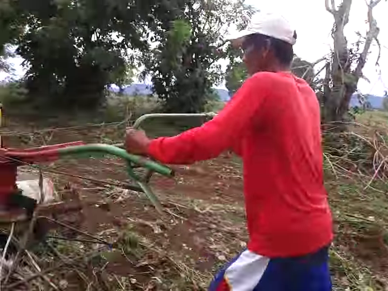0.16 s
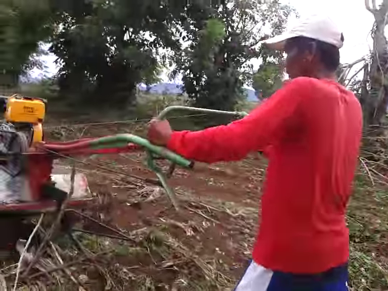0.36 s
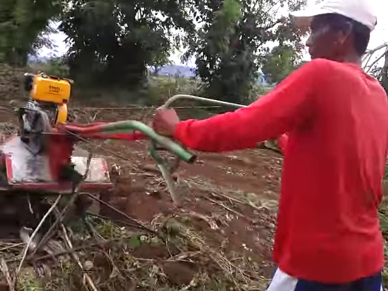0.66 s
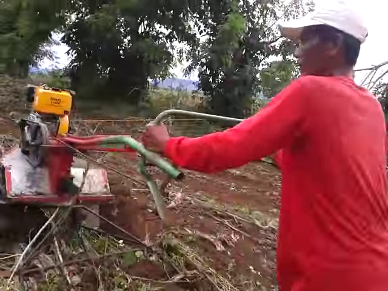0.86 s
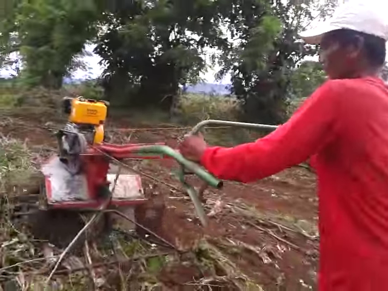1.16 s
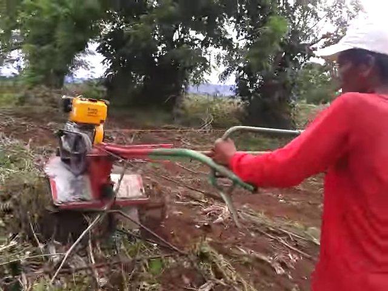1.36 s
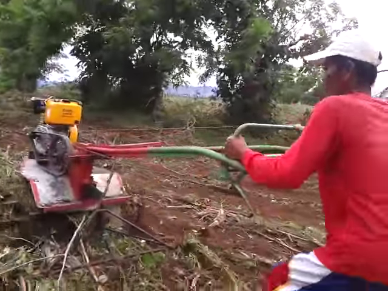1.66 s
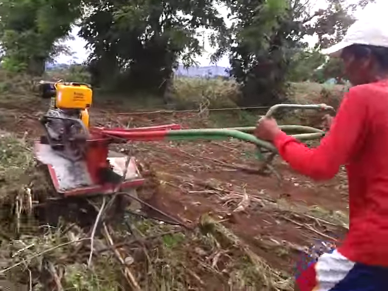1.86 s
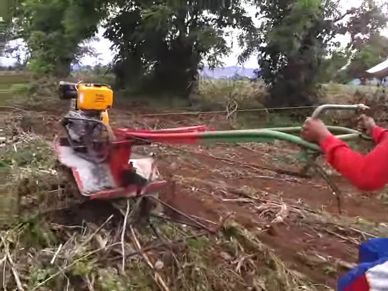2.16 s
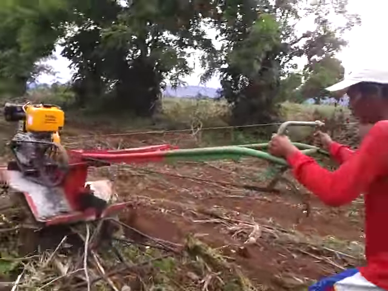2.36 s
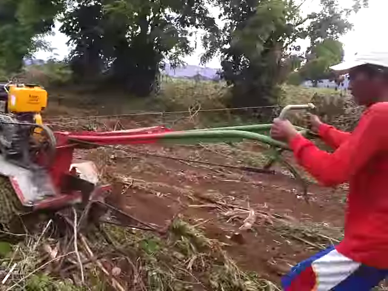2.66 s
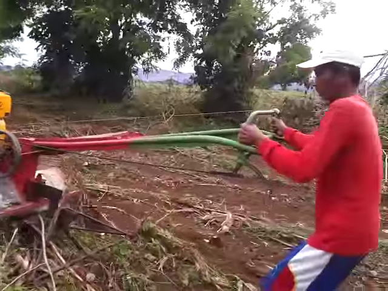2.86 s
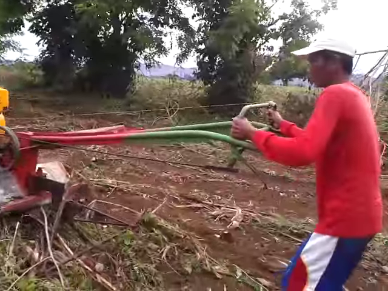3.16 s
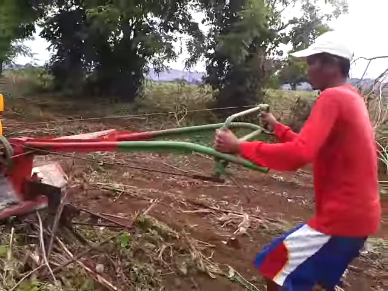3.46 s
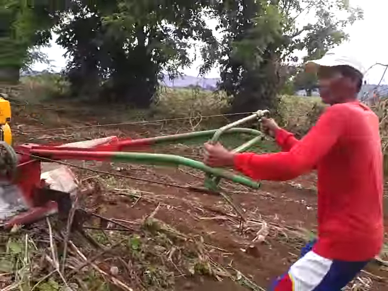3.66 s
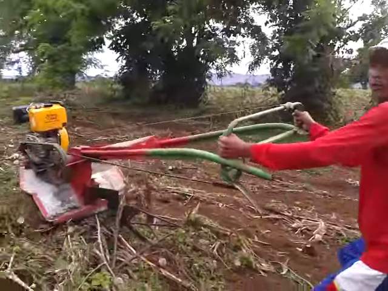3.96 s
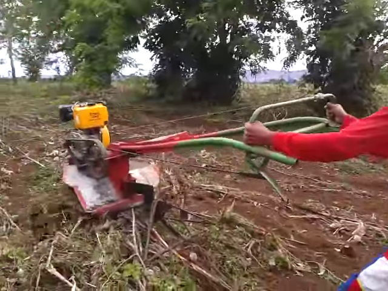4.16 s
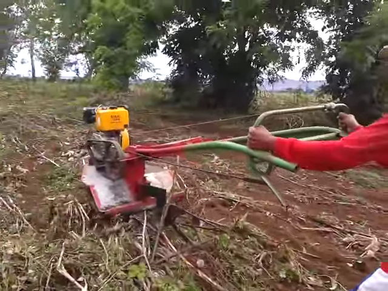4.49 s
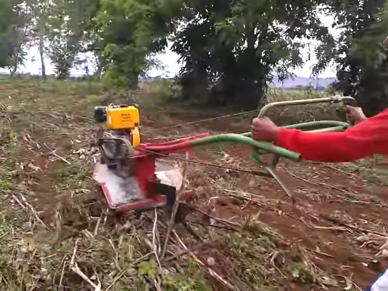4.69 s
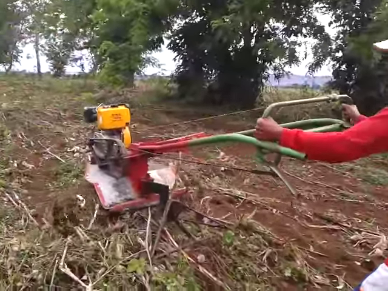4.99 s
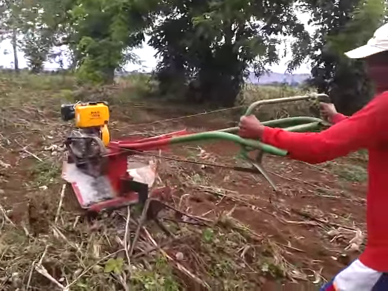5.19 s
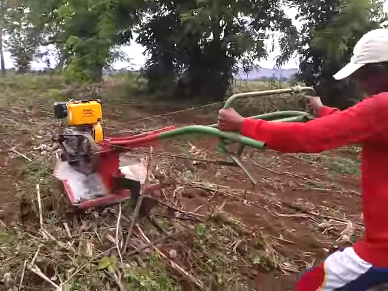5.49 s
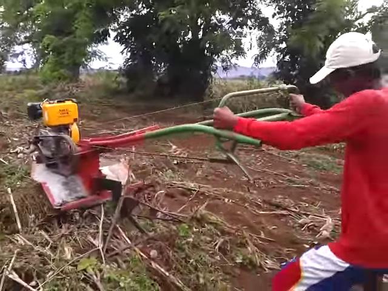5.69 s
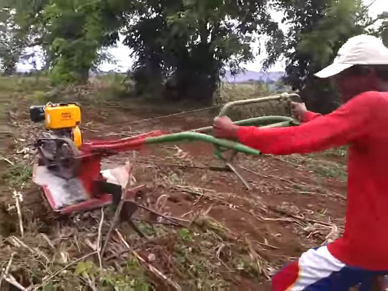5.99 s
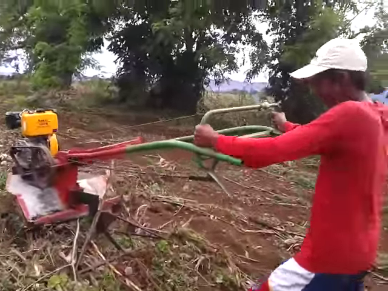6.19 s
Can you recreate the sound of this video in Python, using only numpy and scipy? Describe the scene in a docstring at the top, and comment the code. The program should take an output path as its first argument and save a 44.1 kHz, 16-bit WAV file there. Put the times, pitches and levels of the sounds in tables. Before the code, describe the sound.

Close, rattly putter of a walk-behind tiller, about seventeen or eighteen pops a second, with airy soil rush, buzzing tinwork and sharp metallic clinks.

```python
"""In an open field, a single-cylinder four-stroke tiller works through weedy soil a few metres from the listener.
Each firing is a quick high-then-low muffler pop of two falling notes; a repeating comb of engine orders clatters in step.
Shaped noise makes cooling air, churned soil and a singing cowl; dense taps make the guards jingle, slap and knock.
Loose steel tinkles and clinks as decaying sines. A small microphone with a limiter holds down the loudest peaks."""
import sys
import numpy as np
from scipy import signal
from scipy.fft import rfft, irfft
from scipy.io import wavfile
from scipy.ndimage import uniform_filter1d, minimum_filter1d, map_coordinates

SR = 44100
rng = np.random.default_rng(int(sys.argv[2]) if len(sys.argv) > 2 else 0)


def put_to_file(sound):
    """Save the sound as 16-bit audio at rate SR, in the file named by the first command-line argument."""
    columns = np.atleast_2d(sound).T  # one column per channel
    safe = np.clip(columns, -1, 1)
    whole_steps = np.round(safe * 32767)
    wavfile.write(sys.argv[1], SR, whole_steps.astype(np.int16))


N = 279594
TIME = np.arange(N) / SR

# engine speed, sagging as the tines bite: time_s, firings_per_s
ENGINE_SPEED = [(0.0, 17.469), (0.3, 17.735), (1.04, 17.776), (1.33, 17.621), (1.75, 17.849),
                (3.26, 17.692), (3.69, 17.48), (4.38, 17.703), (4.53, 17.56), (5.47, 17.553),
                (5.68, 17.692), (6.34, 17.262)]
# how near the operator's body stands: time_s, nearness_0_to_1
OPERATOR_NEARNESS = [(0, 0.56), (.22, 0.49), (.4, 0.01), (3, 0.06), (5.5, 0), (5.8, 0.43), (6.34, 0.61)]
# level of the muffler's low note, ahead of the exhaust gain: time_s, level_db
LOW_NOTE_LEVEL = [(0, -15.5), (1.5, -14), (2, -18), (2.45, -13), (3.1, -14), (3.9, -12.5), (5.2, -15.5),
                  (6.34, -15.5)]
# resonances of the muffler shell: pitch_hz, width_hz, level_db
MUFFLER_SHELL = [(651.3, 12, 3), (741.5, 34, -5), (1251, 30, -0.5), (1359, 15.4, 3.5), (1628, 23, 2.5)]
# tone of the engine block: frequency_hz, relative_level_db
BLOCK_TONE = [(60, -48), (88, -32), (105, -9.5), (185, -10.5), (212, 3.5), (285, 1), (370, 3.5), (440, -6),
              (540, 6), (660, 9.5), (780, 4), (900, 0), (1250, 8), (1700, -12)]
# tone of the cooling air and soil: frequency_hz, relative_level_db
AIR_TONE = [(25, -21), (70, -23), (150, -20.5), (260, -4.5), (450, -2), (680, 8), (900, -0.5), (1300, 1),
            (2200, 3.5), (2550, 6.5), (3100, 2.5), (4500, -2.5), (9000, -35), (17000, -20)]
# tone of the thin steel guards: frequency_hz, relative_level_db
GUARD_TONE = [(150, -40), (2800, -24), (3700, -14), (4500, -9), (5300, -4), (5700, 0.5), (6050, 0.5),
              (6500, -6.5), (7100, -10.5), (8200, -18), (12000, -26.5), (17000, -30)]
# the hardest knocks of the guards: start_s, level_db
GUARD_KNOCKS = [(1.264, -7), (1.324, -12), (3.273, -8), (3.561, -7), (4.028, -11), (5.792, -4),
                (5.848, -11), (6.096, -3), (6.189, -4)]
# how hard the loose steel rings: time_s, level_db
STEEL_LEVEL = [(0, -39), (.55, -22), (1, -12), (1.5, -26), (2.7, -21), (4.7, -24), (5.6, -24),
               (6.34, -15.5)]
# ringing modes of the loose steel: pitch_hz, relative_level_db, t60_s
STEEL_MODES = [(4610, 5.5, 0.14), (5178, 13.5, 0.098), (5560, -24, .05), (5620, 6, 0.12), (6010, 4, 0.16),
               (6630, 5, 0.27), (7100, -21, 0.034), (7700, -2, 0.3), (8800, -7.5, 0.054),
               (10200, -11, 0.14), (14100, -24, 0.11)]
# the hardest blows of steel on steel: start_s, level_db
STEEL_CLINKS = [(0.47, -12), (.5122, 7), (0.909, -4.5), (1.285, -3), (1.4172, 2.5), (1.6112, -2.5),
                (1.66, -5), (1.7654, -4), (1.81, -2), (4.147, -1.5), (4.89, -5.5), (5.892, 1.5), (6.001, 7),
                (6.2781, 2.5)]
# colour the operator's body gives rush and rattle when close: frequency_hz, gain_db
BODY_TONE = [(800, 0), (1150, 9.5), (1800, 10), (2300, 6.5), (2600, 1), (3050, -16), (3600, -0.5),
             (5000, -9), (6300, -4.5), (7500, -24.5), (11000, -4.5), (15500, -5)]

FIRST_FIRING_S = .0203  # before jitter
# the muffler's nominal notes: pitch_hz at the peak, glide_hz_per_s, peak_s, spread_s
HIGH_NOTE = (1320, -70000, .0027, .0017)
LOW_NOTE = (690, -22000, .0066, .0026)
# the high note's usual level ahead of the exhaust gain, and its lift when the outlet
# faces the listener or the operator's body reflects it
HIGH_DB, FACING_DB, REFLECTED_DB = -13, 2, 8.5
# the machine swings round once: when the outlet faces the listener, and for how long
FACING_S, FACING_SPREAD_S = 3.11, 0.86
# the guards' usual jingle, and its lift when the operator's body reflects it
JINGLE_DB, JINGLE_NEAR_DB = -13.5, 9
CLINK_HZ = 5207  # hard blows mainly wake the steel mode nearest this pitch
TOP_HZ = 17100  # upper limit of the microphone


def undb(db):
    """Decibels to gain."""
    return 10 ** (np.asarray(db) / 20)


def unit(x):
    """Scale to rms 1."""
    return x / np.sqrt(np.mean(x ** 2))


def curve(table):
    """A two-column table as a curve over time."""
    s, value = np.transpose(table)
    return np.interp(TIME, s, value)


def ring(x, response):
    """Pass a sound through an impulse response."""
    return signal.oaconvolve(x.astype(np.float32), response.astype(np.float32))[:N]


def colour(x, points, size=4096):
    """Minimum-phase filter with the given outline of frequency_hz, level_db."""
    hz, db = np.transpose(points)
    f = np.maximum(np.fft.rfftfreq(size, 1 / SR), 1)
    outline_db = np.interp(np.log(f), np.log(hz), db)
    # folding the cepstrum forward keeps the response from sounding early
    cepstrum = irfft(np.log(undb(outline_db)))
    cepstrum[1:size // 2] *= 2
    cepstrum[size // 2 + 1:] = 0
    return ring(x, irfft(np.exp(rfft(cepstrum))))


def resonate(x, hz, width_hz):
    """One band-pass resonance."""
    return signal.lfilter(*signal.iirpeak(hz, hz / width_hz, fs=SR), x)


def high_pass(x, order, hz):
    """Butterworth bass cut."""
    return signal.sosfilt(signal.butter(order, hz, "high", fs=SR, output="sos"), x)


def strikes(times, sizes):
    """One impulse at each time."""
    return np.bincount(np.clip(np.asarray(times) * SR, 0, N - 1).astype(int), sizes, N)


def walk(rate):
    """Random wander in straight lines between normal draws, `rate` draws per second."""
    steps = rng.standard_normal(N // 16)
    return np.interp(TIME * rate, np.arange(len(steps)), steps)


def drift(sounds):
    """Fade slowly through several sounds, one after another, at even power."""
    place = TIME / TIME[-1] * (len(sounds) - 1)
    return sum(x * np.sqrt(np.maximum(1 - np.abs(place - k), 0)) for k, x in enumerate(sounds))


def nearness():
    """How near the operator's body stands, 0-1."""
    return curve(OPERATOR_NEARNESS)


def crank(jitter_s=0.00015):
    """Firing times, engine cycles turned, the number of the running cycle and the time since its firing."""
    turns = np.cumsum(curve(ENGINE_SPEED)) / SR
    turns -= np.interp(FIRST_FIRING_S, TIME, turns)
    steady = np.interp(np.arange(int(turns[-1]) + 1), turns, TIME)
    # one firing ahead of the start gives the opening its dying pop
    firings = np.r_[FIRST_FIRING_S - 1 / ENGINE_SPEED[0][1], steady]
    firings = firings + jitter_s * rng.standard_normal(len(firings))
    cycle = np.maximum(np.searchsorted(firings, TIME) - 1, 0)
    age = np.maximum(TIME - firings[cycle], 0)
    return firings, turns, cycle, age


def note(age, hz, glide, peak_s, spread_s, stretch):
    """A few cycles that swell, sink in pitch and die; a stretched note sinks more slowly."""
    t = age - peak_s
    swell = np.exp(-(t / (spread_s * stretch)) ** 2 / 2)
    swell = swell * np.minimum(age * 2000, 1)  # half a millisecond of fade-in
    cycles = hz * t + glide / stretch ** 4 * t ** 2 / 2
    return unit(swell * np.sin(2 * np.pi * cycles))


def exhaust(firings, cycle, age, gain_db=-10.0, scatter_db=.5, gas=0.24, crack_db=-29, crack_s=0.0097,
            tail_db=-14, tail_s=0.0076, tail_rise_s=0.0017):
    """Blow-down sounds the muffler's high note, then its low one as pressure drops; frame and ground scatter both."""
    high_chance, low_chance, warm_chance, length_chance = rng.standard_normal((len(firings), 4))[cycle].T
    facing = np.exp(-((TIME - FACING_S) / FACING_SPREAD_S) ** 2)
    high_db = HIGH_DB + FACING_DB * facing + REFLECTED_DB * nearness() + scatter_db * high_chance
    low_db = curve(LOW_NOTE_LEVEL) + scatter_db * low_chance
    warm_age = age * (1 + 0.011 * warm_chance)
    # the high note rings longest while the muffler is turned most squarely to the listener
    high = note(warm_age, *HIGH_NOTE, .86 + .32 * facing) * undb(high_db)
    low_stretch = 1 + 0.11 * np.tanh(length_chance)
    low = note(warm_age * (1 + 0.068 * facing), *LOW_NOTE, low_stretch) * undb(low_db)
    direct = (high + low) * (1 + gas * walk(1800)) * undb(gain_db)
    # the valve opens with a short crack of gas, softer when the outlet faces the listener
    crack = unit(resonate(rng.standard_normal(N), 1780, 380) * np.exp(-age / crack_s))
    direct = direct + crack * undb(crack_db) * (1 - .5 * facing)
    # the muffler shell rings on between firings
    direct = direct + sum(undb(db) * resonate(direct, hz, width) for hz, width, db in MUFFLER_SHELL)
    # the pops carry little bass below about 250 Hz
    direct = high_pass(direct, 2, 250)
    t = TIME[:SR // 10]
    fade = np.exp(-t / tail_s) * (1 - np.exp(-t / tail_rise_s))
    # the scattered paths come and go as the machine moves
    tail = drift([ring(direct, rng.standard_normal(len(t)) * fade) for _ in range(6)])
    return direct + unit(tail) * np.std(direct) * undb(tail_db)


def block(turns, clatter_db=-24.0, count=100, size=8192):
    """Piston and valve gear clatter every cycle: a comb of engine orders whose pattern slowly changes."""
    place = (turns % 1 * size).astype(int)
    patterns = [irfft(np.exp(2j * np.pi * rng.random(count)), size)[place] for _ in range(7)]
    return unit(colour(drift(patterns), BLOCK_TONE)) * undb(clatter_db)


def rush(age, air_db=-20.0, pulse=0.95, pulse_s=0.036, flutter_db=1.2):
    """Cooling air and churned soil: noise surging after each firing."""
    surge = (1 + pulse * np.exp(-age / pulse_s)) * undb(flutter_db * walk(25))
    return unit(colour(rng.standard_normal(N) * surge, AIR_TONE)) * undb(air_db)


def cowl(age, cowl_db=-31, hz=2620, width_hz=160, pulse=1., pulse_s=.02):
    """The engine's tin cowl sings in one thin band, shaken by each firing."""
    drive = rng.standard_normal(N) * (1 + pulse * np.exp(-age / pulse_s))
    return unit(resonate(drive, hz, width_hz)) * undb(cowl_db)


def guards(firings, turns, age, taps_per_s=2500, spread_db=-1.0, hiss=0.19, wander_db=.5,
           slap_db=-13, slap_s=0.0048, knock_s=0.026, crack=0.37):
    """Thin guards chatter in dense taps, slap at each firing and now and then knock hard."""
    sizes = undb(spread_db * np.minimum(rng.exponential(size=N), 3.5))
    taps = (rng.random(N) < taps_per_s / SR) * sizes * rng.choice([-1, 1], N)
    # the shaft also shakes the frame four times a cycle
    sway = 1 + 0.12 * np.cos(2 * np.pi * 4 * (turns - .03))
    kick = 1 + 1.15 * np.exp(-age / 0.005)
    drive = (taps + hiss * rng.standard_normal(N)) * kick * sway * undb(2.0 * walk(60))
    jingle_db = JINGLE_DB + JINGLE_NEAR_DB * nearness() + wander_db * walk(3.15)
    jingle = unit(colour(drive, GUARD_TONE)) * undb(jingle_db)
    t = TIME[:SR // 10]
    uneven_db = 3.5 * rng.standard_normal(len(firings))
    slaps = ring(strikes(firings, undb(slap_db + uneven_db)), np.exp(-t / slap_s))
    start_s, level_db = np.transpose(GUARD_KNOCKS)
    knocks = ring(strikes(start_s, undb(level_db)), np.exp(-t / knock_s))
    # slaps and knocks share a ringing plate tone and a broad snap
    plate = unit(resonate(resonate(rng.standard_normal(N), 5760, 900), 5760, 900))
    snap_tone = [(40, -40), (300, -23), (3000, 1.5), (12000, -9), (17000, -8)]
    snap = unit(colour(rng.standard_normal(N), snap_tone))
    return jingle + (slaps + knocks) * (plate + crack * snap)


def steel(touches_per_s=160, spread_db=4, others=0.059, loose=1.0):
    """Loose steel parts touch at random, each touch waking one of the modes; square blows clink out."""
    t = TIME[:SR // 6]
    start_s, blow_db = np.transpose(STEEL_CLINKS)
    main = np.argmin(np.abs(CLINK_HZ - np.transpose(STEEL_MODES)[0]))
    tinkle = clinks = 0
    for k, (hz, db, t60) in enumerate(STEEL_MODES):
        mode = np.sin(2 * np.pi * hz * t) * np.exp(-np.log(1000) * t / t60)
        gaps, force = rng.exponential(size=(2, 8000))
        times = np.cumsum(gaps) / touches_per_s
        sizes = undb(spread_db * np.minimum(force, 3))
        touches = strikes(times, (times < TIME[-1]) * sizes)
        tinkle = tinkle + undb(db) * ring(touches, mode)
        share = 1 if k == main else others * undb(db)
        clinks = clinks + ring(strikes(start_s, undb(blow_db) * share), mode)
    # the parts buzz against their seats while they ring
    buzz = 1 + loose * walk(160)
    return unit(tinkle) * undb(curve(STEEL_LEVEL)) * buzz + clinks


def pings(per_s=7, ping_db=-30, spread_db=5, t60_s=0.22, touch_s=.002, detune=.004, count=80):
    """Light glancing touches, at random, wake only the steel's highest mode."""
    t = TIME[:SR // 5]
    fade = np.exp(-np.log(1000) * t / t60_s) * (1 - np.exp(-t / touch_s))
    out = np.zeros(N + len(t))
    chance = rng.uniform(-0.9, 1, (count, 3))
    times = np.cumsum(1 + chance[:, 0]) / per_s
    for start_s, (_, force, pitch) in zip(times, chance):
        start = int(start_s * SR)
        if start < N:
            hz = STEEL_MODES[-1][0] * (1 + detune * pitch)
            level = undb(ping_db + spread_db * force)
            out[start:start + len(t)] += level * fade * np.sin(2 * np.pi * hz * t)
    return out[:N]


def contacts(tick_db=-17, tick_s=0.012, bright_hz=9000):
    """Each hard blow of steel starts with a short bright scrape of noise."""
    start_s, level_db = np.transpose(STEEL_CLINKS)
    burst = ring(strikes(start_s, undb(level_db + tick_db)), np.exp(-TIME[:SR // 10] / tick_s))
    return burst * high_pass(rng.standard_normal(N), 2, bright_hz)


def past_operator(x):
    """The sound turns boxier when the operator's body is close to the microphone."""
    near = nearness()
    return (1 - near) * x + near * colour(x, BODY_TONE)


def wobble(x, sway_s=.000025):
    """The shaking parts move to and fro, which smears their pitch."""
    heard_s = TIME + sway_s * walk(70)
    return map_coordinates(x, [heard_s * SR], order=3, mode="nearest")


def scene():
    """Exhaust, engine block, air and guards follow one crank; loose steel rings on its own times."""
    firings, turns, cycle, age = crank()
    engine = exhaust(firings, cycle, age) + block(turns)
    clatter = past_operator(rush(age) + cowl(age) + guards(firings, turns, age))
    loose_steel = wobble(steel() + pings()) + contacts()
    return (engine + clatter + loose_steel)[None]


def record(dry, ceiling=1.287, bass_hz=70):
    """The small microphone drops the bass; a fast limiter and a soft clip hold the peaks; both ends are cut."""
    dry = high_pass(dry, 3, bass_hz)
    width = int(.003 * SR)
    # the gain ducks around each peak, then is smoothed over the same 3 ms
    gain = minimum_filter1d(np.minimum(1, ceiling / (np.abs(dry) + 1e-9)), width)
    limited = dry * uniform_filter1d(gain, width)
    clipped = limited / (1 + (limited ** 2) ** 4) ** (1 / 8)
    clipped = high_pass(clipped, 2, 65)
    return signal.sosfilt(signal.ellip(10, .1, 70, TOP_HZ, fs=SR, output="sos"), clipped)


dry = scene()
out = record(dry)
put_to_file(out)
```